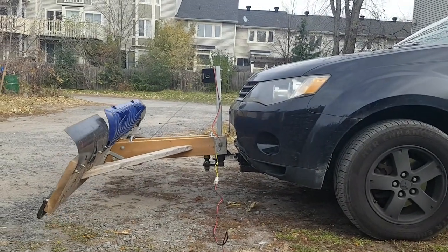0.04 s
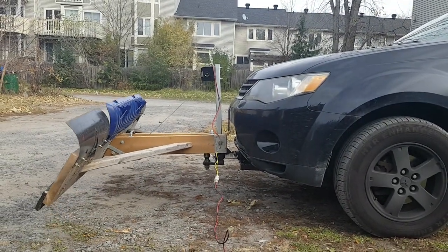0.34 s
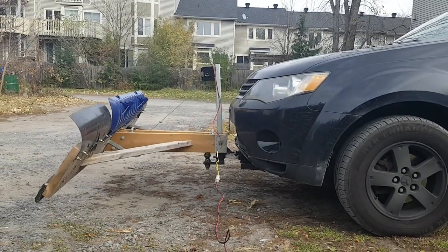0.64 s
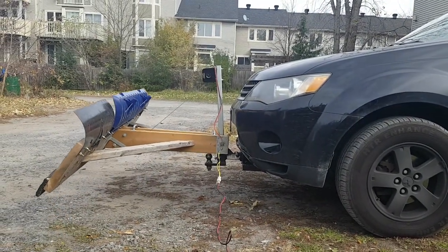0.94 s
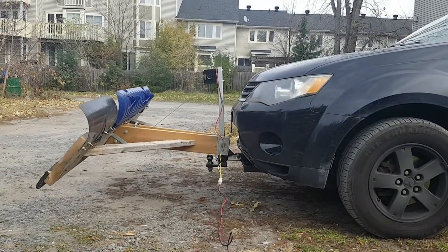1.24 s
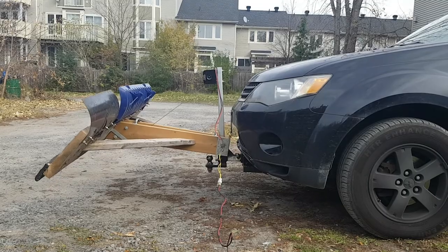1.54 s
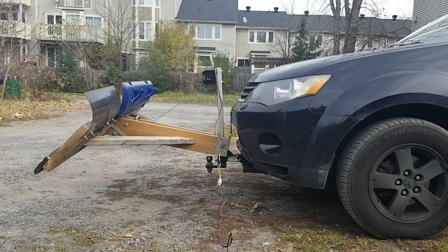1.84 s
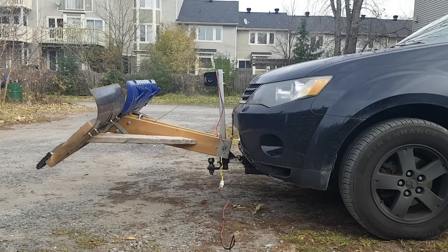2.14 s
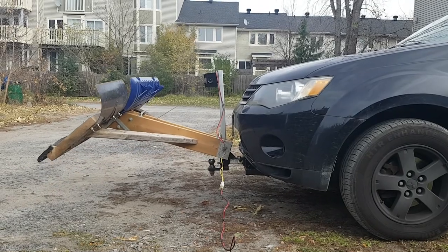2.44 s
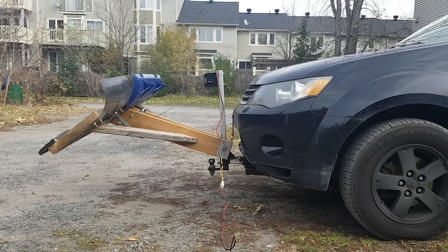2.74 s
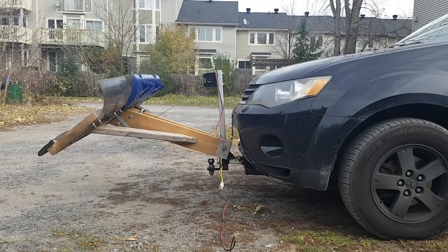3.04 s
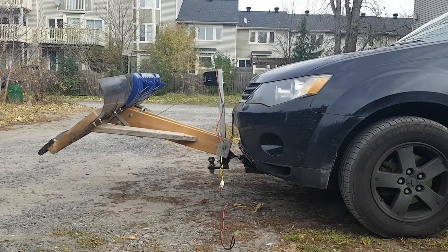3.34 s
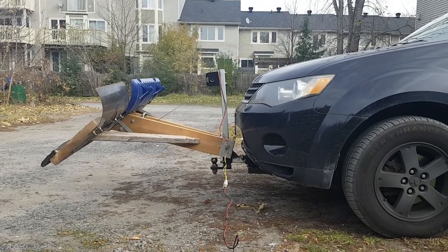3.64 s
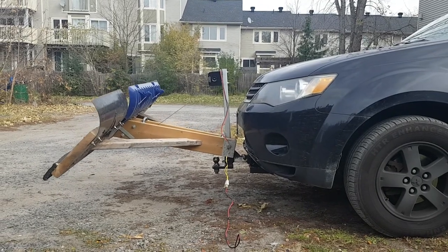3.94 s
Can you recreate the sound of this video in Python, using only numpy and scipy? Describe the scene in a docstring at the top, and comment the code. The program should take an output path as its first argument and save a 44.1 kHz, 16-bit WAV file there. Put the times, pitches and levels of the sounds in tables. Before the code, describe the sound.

An electric winch whines lifting a plow blade outdoors, stops, clicks, then lowers it faster.

```python
"""A small electric winch on a parked car lifts a plow blade, strains to a stop and lets it down again.
Its gears whine at harmonics of the meshing rate, while tooth impacts and friction excite a metal
housing and the motor brushes hiss. Wheels slightly out of true modulate speed and level into a throb.
The rig and the switch click in the pause; around them lies a quiet gravel lot with a faint echo."""
import sys
import numpy as np
from scipy import signal
from scipy.fft import rfft, irfft
from scipy.io import wavfile

SR = 44100
rng = np.random.default_rng(int(sys.argv[2]) if len(sys.argv) > 2 else 0)


def file_out(sig):
    """Save sig as 16-bit WAV at sys.argv[1]."""
    # one column per channel
    cols = np.atleast_2d(sig).T
    # limit, then scale
    lim = np.clip(cols, -1, 1)
    pcm = np.round(lim * 32767).astype(np.int16)
    wavfile.write(sys.argv[1], SR, pcm)


N = 176400
T, HZ = np.arange(N) / SR, np.fft.rfftfreq(N, 1 / SR)


def amp(db):
    """Amplitude ratio of a level in decibels."""
    return 10 ** (np.asarray(db) / 20)


def unit(x):
    """Normalisation to rms 1."""
    return x / np.sqrt(np.mean(x ** 2) + 1e-20)


def curve(points):
    """Linear interpolation over time."""
    return np.interp(T, *np.transpose(points))


def spectrum(points):
    """Interpolation over log frequency."""
    f, value = np.transpose(points)
    return np.interp(np.log(HZ + 1), np.log(f + 1), value)


def colour(x, db):
    """Minimum-phase filter: folding the cepstrum makes the gain curve causal."""
    cepstrum = irfft(np.log(amp(np.maximum(db, -100))), N)
    cepstrum[1:N // 2] *= 2
    cepstrum[N // 2 + 1:] = 0
    response = irfft(np.exp(rfft(cepstrum)), N)[:4096]
    return signal.oaconvolve(x, response)[:N]


def hump(hz, octaves):
    """Resonance curve in dB, 6 dB down at the given half-width."""
    return -20 * np.log10(1 + (np.log2((HZ + 1) / hz) / octaves) ** 2)


def wander(hz):
    """Random modulation: low-passed noise of rms 1."""
    return unit(irfft(rfft(rng.standard_normal(N)) / (1 + (HZ / hz) ** 4), N))


def scatter(x, t60=0.039):
    """All-pass dispersion: the housing smears a sound in time and keeps its colour."""
    t, lead = T[:4096], 256
    tail = rfft(rng.standard_normal(len(t)) * amp(-60 * t / t60))
    allpass = np.roll(irfft(tail / abs(tail)), lead)
    return signal.oaconvolve(x, allpass)[lead:lead + N]


# likeness of left and right: f/Hz, coherence
COHERENCE = [(60, 0.24), (110, 0.37), (200, 1), (380, 0.95), (700, 0.96), (1290, 0.86), (2380, 0.73),
             (4400, 0.19), (8120, 0.14), (15000, 0.29)]
# left minus right: f/Hz, level/dB
BALANCE = [(60, 0), (200, -0.5), (700, 2), (2300, 1.5), (4400, 0.5), (8000, 8), (14000, -1)]

def stereo(common, difference, left_lead_s=.000045, lead_below_hz=2000):
    """Partial coherence: two channels share a mid signal, whose lows reach the left first."""
    same, lean = np.clip(spectrum(COHERENCE), 0, .99), spectrum(BALANCE)
    mid = rfft(common) * np.sqrt((1 + same) / 2)
    side = rfft(difference) * np.sqrt((1 - same) / 2)
    delay = np.exp(-2j * np.pi * HZ * left_lead_s / (1 + (HZ / lead_below_hz) ** 2))
    return irfft(np.array([(mid + side) * amp(lean / 2), (mid - side) * amp(-lean / 2) * delay]), N)


def wheels(cycles, teeth):
    """Periodic modulation: each uneven wheel adds a cosine of the count of teeth passed."""
    return sum(swing * np.cos(2 * np.pi * (teeth - crest) / period) for period, crest, swing in cycles)


# modes of the frame: f/Hz, bandwidth/Hz, level/dB
FRAME_MODES = [(229, 48, -39.5), (403, 72, -37), (551, 148, -35.5), (724, 47, -31), (821.5, 18.5, -33),
               (917, 44, -30.5), (991, 12.6, -34), (1200, 43, -37.5), (1302, 60, -34), (1382, 66, -38.5),
               (1497, 160, -43.5), (1764, 98, -42), (2073, 116, -36), (2540, 77, -40.5), (2787, 100, -43),
               (3036, 94, -41), (3230, 140, -40.5)]
# harmonics 1, 2, 3...: lifting level/dB, lowering level/dB
HARMONICS = [(-4.5, 0), (-5, 0.5), (-2, 0), (-1, -2.5), (0.5, 6.5), (-1.5, 4), (-1.5, -1), (1, 5.5),
             (-0.5, 6.5), (-0.5, -1), (-1, 9), (-3.5, 5), (-2.5, -2)]
# their swell while lifting: once-a-turn swing/dB, its crest/teeth, twice-a-turn swing/dB
HARMONIC_SWELLS = [(5, 19, 0), (1.3, 41, 0), (0, 0, 3), (2.2, 44, 0), (1.3, 40, 3.9), (2.2, 11, 2.4),
                   (4, 17, 1), (2.4, 43, 1.4), (2.6, 3, 1), (1.8, 3, 1), (2.8, 1, 0), (3.4, 7, 0),
                   (2, 3, 0)]
# gain of the whine as the teeth bear harder: t/s, level/dB
TOOTH_LOAD = [(0, -.5), (.6, 0), (.9, -1), (2.52, -1), (2.62, 1), (2.82, 1.5), (3.5, -12), (3.555, 0),
              (4, 0)]

def whine(teeth, turned, lowering, throb_db, roughness=.36, flutter_hz=32):
    """Forced vibration: harmonics of the meshing rate flare as they cross the frame's resonances."""
    wheel_teeth, tight_tooth = 47.3, 20
    out, mesh_hz = np.zeros(N), np.gradient(teeth) * SR
    frame = np.sqrt(sum(amp(db) ** 2 / (1 + (2 * (HZ - hz) / width) ** 2)
                        for hz, width, db in FRAME_MODES))
    for k, (lift_db, lower_db) in enumerate(HARMONICS, 1):
        once_db, crest, twice_db = HARMONIC_SWELLS[k - 1]
        swell = wheels([(wheel_teeth, crest, once_db), (wheel_teeth / 2, tight_tooth, twice_db)], turned)
        db = np.where(lowering, lower_db, lift_db + swell) + throb_db
        flutter = 1 + roughness * (wander(flutter_hz) + 1j * wander(flutter_hz))
        carrier = np.exp(2j * np.pi * (k * teeth + rng.random()))
        out += amp(db) * np.interp(k * mesh_hz, HZ, frame) * unit((flutter * carrier).real)
    return out * amp(curve(TOOTH_LOAD))


# response of the housing, lifting and lowering: f/Hz, relative level/dB
HOUSING_LIFT = [(100, -25.5), (200, -17.5), (330, -12.5), (430, -9.5), (540, -7.5), (640, -4), (820, -0.5),
                (950, -4), (1170, -6), (1370, -10.5), (1700, -8), (2080, -0.5), (2350, -12), (2600, -8),
                (3050, -6), (3450, -9.5), (3900, -15.5), (4900, -20.5), (7000, -24.5), (8300, -24),
                (8900, -32.5), (11300, -37), (13500, -28.5), (15600, -65)]
HOUSING_LOWER = [(59, -60), (100, -16), (173, -20.5), (293, -13.5), (394, -4), (497, -17.5), (640, -3),
                 (758, 2), (1060, -8.5), (1180, -34), (1460, -3), (1960, -4.5), (2470, -8), (3050, -4),
                 (4860, -21), (8060, -22), (8950, -28), (11100, -25.5), (15500, -37)]
# modes of the housing: f/Hz, bandwidth/Hz, level/dB
HOUSING_MODES = [(575.6, 77, -47), (1334, 160, -39.5), (2035, 56, -47), (2390, 41, -53), (2993, 30, -46)]

def rattle(teeth, lowering, lift_db=-32, lower_db=-28.7, spread_db=7.5, jitter_s=.00012):
    """Impact and friction: each tooth knocks and scrapes, exciting the housing and its modes."""
    contacts = np.flatnonzero(np.diff(np.floor(teeth)) > 0)
    size, late = rng.standard_normal((N // 20, 2))[:len(contacts)].T
    onsets = np.clip(contacts + (late * jitter_s * SR).astype(int), 0, N - 1)
    knocks, paths = np.zeros(N), []
    knocks[onsets] = amp(spread_db * np.clip(size, -2, 2))
    scrape_share = 0.74  # of the driving power
    for _ in range(2):
        scrape = unit(rng.standard_normal(N) * np.exp(-(teeth % 1)))
        impacts = unit(scatter(knocks - knocks.mean()))
        drive = np.sqrt(1 - scrape_share) * impacts + np.sqrt(scrape_share) * scrape
        lift = amp(lift_db) * unit(colour(drive, spectrum(HOUSING_LIFT)))
        lower = amp(lower_db) * unit(colour(drive, spectrum(HOUSING_LOWER)))
        body = np.where(lowering, lower, lift)
        for hz, width, db in HOUSING_MODES:
            peak = signal.iirpeak(hz, hz / width / 2, SR)
            body += amp(db) * unit(signal.lfilter(*peak, signal.lfilter(*peak, drive)))
        paths.append(body)
    return np.array(paths)


# modes of small, dry steel parts: f/Hz, level/dB, T60/s
STEEL_MODES = [(4327, -55, 0.094), (5310, -62, 0.057), (6100, -59.5, 0.078), (6620, -65, 0.28),
               (8020, -58, 0.046), (8330, -64.5, 0.032), (10570, -65.5, 0.018), (13500, -69, .008)]

def chirps(lowering, hits_per_s=55, spread_db=5, lowering_boost_db=5):
    """Damped free vibration: chance contacts set small steel parts ringing."""
    out, t = np.zeros((2, N)), T[:SR // 8]
    for hz, db, t60 in STEEL_MODES:
        struck = rng.random(N) < hits_per_s / SR
        hits = struck * amp(spread_db * np.clip(rng.standard_normal(N), -2, 2))
        tone = np.sin(2 * np.pi * hz * t) * t * amp(-60 * t / t60)
        for path in out:
            path += amp(db) * unit(signal.oaconvolve(hits * rng.choice([-1, 1], N), tone)[:N])
    return out * amp(lowering_boost_db * lowering)


# hiss of the motor brushes: f/Hz, relative level/dB
BRUSH_SPECTRUM = [(1500, -5), (3300, 4), (4800, -11), (7800, 1), (8400, -2), (9000, -9), (11000, 0),
                  (13400, -9), (15600, -10.5)]

def brushes(lowering, db=-47, lowering_boost_db=4.5, waver_db=2, waver_hz=37):
    """Sliding-contact noise: a wavering hiss, louder as the motor runs free to lower the blade."""
    hiss = np.array([unit(colour(rng.standard_normal(N), spectrum(BRUSH_SPECTRUM))) for _ in range(2)])
    return hiss * amp(db + lowering_boost_db * lowering + waver_db * wander(waver_hz))


# teeth meshing per second under load: t/s, f/Hz
MESH_RATE = [(0, 251), (.55, 253), (.9, 259), (1.35, 266), (1.8, 272), (2.15, 275), (2.5, 267), (2.65, 250),
             (2.73, 234), (2.84, 225), (3.48, 150), (3.52, 230), (3.55, 284), (3.58, 327), (3.61, 353),
             (3.65, 373), (3.72, 384), (3.82, 389), (3.9, 397), (4, 399)]
# speed sway from uneven wheels: period/teeth, crest/teeth, swing/Hz
SPEED_SWAY = [(47.65, 35.8, 4.7), (21.75, 20.1, 1.9), (43.5, 24.2, 1.6), (51.4, 29.9, 1.1), (40.5, 29.3, 1)]
# level swell from tight spots: period/teeth, crest/teeth, relative swing
TIGHT_SPOTS = [(23.7, 19.8, 1.6), (16.4, 14.5, 1.3), (25.05, 15.3, .6), (47.65, 45.3, .5), (15.5, 11.4, .5)]
# depth of that swell: t/s, factor
THROB_DEPTH = [(.05, .6), (.25, 1.05), (.5, 1.05), (1, .72), (2.3, .72), (2.7, .4), (4, .4)]
# how hard the gears are driven: t/s, level/dB
EFFORT = [(0, 0), (.6, 0.5), (1.1, 0.5), (2.2, 1.2), (2.55, 0.5), (2.6, 0), (2.67, -0.5), (2.816, -1.5),
          (2.847, -18.5), (2.93, -48), (3.05, -48), (3.46, -50), (3.482, -21), (3.505, -3.5), (3.57, -1.5),
          (3.75, 1.5), (4, 1.5)]

def winch(reverse_s=3.2, slip_teeth=.01, slip_hz=35):
    """Frequency and amplitude modulation: one rotation sways the pitch and makes the gear train throb."""
    speed = curve(MESH_RATE)
    turned = np.cumsum(speed) / SR  # teeth passed, without sway or slip
    teeth = np.cumsum(speed + wheels(SPEED_SWAY, turned)) / SR + slip_teeth * wander(slip_hz)
    lowering = T > reverse_s
    throb = wheels(TIGHT_SPOTS, turned) * curve(THROB_DEPTH)
    tone = whine(teeth, turned, lowering, throb_db=.6 * throb)
    noise = (rattle(teeth, lowering) + chirps(lowering) + brushes(lowering)) * amp(.85 * throb)
    paths = np.array([tone, scatter(tone)]) + noise + flares()
    return stereo(*(paths * amp(curve(EFFORT))))


def echo(x, t60=0.67):
    """Reverberation: dense reflections from the houses decay exponentially."""
    t = T[:SR // 2]
    tail = rng.standard_normal(len(t)) * amp(-60 * t / t60)
    reflections = signal.oaconvolve(x, tail / np.linalg.norm(tail))[:N]
    return colour(reflections, hump(hz=700, octaves=3.5))


# distant outdoor wash: f/Hz, relative level/dB
AIR_SPECTRUM = [(15, -74), (25, -31), (37, -19), (64, -9), (281, -11), (399, -9), (445, -7), (684, -9.5),
                (741, -3), (1110, -11), (2010, -21), (8810, -43.5), (15500, -41)]
# low rumble: t/s, level/dB
RUMBLE_LEVEL = [(0, -79), (1.1, -62), (1.7, -56), (2.2, -59), (2.9, -94), (3.6, -69), (3.85, -48.5),
                (4, -60)]

def outdoors(air_db=-47, air_side=0.63, rumble_side=0.76, rumble_left_db=8.0):
    """Ambient noise, partly coherent between the ears: a steady wash and a lumpy rumble to the left."""
    air = [unit(colour(rng.standard_normal(N), spectrum(AIR_SPECTRUM))) for _ in range(2)]
    low = [unit(colour(rng.standard_normal(N), hump(hz=85, octaves=1))) for _ in range(2)]
    sides = np.array([[1], [-1]])
    wash = (air[0] + air_side * sides * air[1]) * amp(air_db + .5 * wander(hz=7.1))
    rumble_db = curve(RUMBLE_LEVEL) + rumble_left_db * sides + 2 * wander(hz=13)
    return wash + (low[0] + rumble_side * sides * low[1]) * amp(rumble_db)


# flares and squeaks: centre t/s, half-length/s, f/Hz, half-width/octaves, level/dB
FLARES = [(2.378, .005, 12800, .04, -40), (2.619, 0.02, 785, 0.037, -23), (3.562, 0.017, 889, 0.015, -23.5),
          (3.68, .025, 3310, .04, -28.5), (3.697, 0.011, 3025, 0.018, -27),
          (3.712, 0.0073, 8110, 0.027, -37), (3.87, 0.021, 420, 0.088, -28)]

def flares():
    """Brief narrow-band bursts: the whine flares on the casing's resonances, with a few high squeaks."""
    out = np.zeros((2, N))
    for s, length, hz, octaves, db in FLARES:
        band = irfft(rfft(rng.standard_normal((2, N))) * amp(hump(hz, octaves)), N)
        out += unit(band) * amp(db) * np.exp(-((T - s) / length) ** 2)
    return out


# snaps of the rig and switch: t/s, level/dB, f/Hz, half-width/octaves, T60/s
RIG_CLICKS = [(2.868, -33.5, 2420, 0.49, 0.026), (3.058, -46, 2380, 0.35, 0.046),
              (3.102, -42, 1100, 0.55, 0.017), (3.382, -32.5, 1670, 0.26, 0.024),
              (3.42, -36, 5940, 5, 0.033), (3.431, -38, 8000, 6.6, 0.013), (3.463, -55, 7000, 1.5, .02)]

def clicks():
    """Heavily damped transients: each snap is decaying noise through one broad resonance."""
    out = np.zeros((2, N))
    for s, db, hz, octaves, t60 in RIG_CLICKS:
        resonance = hump(hz, octaves)
        rms_gain = np.sqrt(np.mean(amp(resonance) ** 2))
        decay = (T >= s) * amp(db - 60 * np.maximum(T - s, 0) / t60)
        for path in out:
            path += colour(rng.standard_normal(N) * decay, resonance) / rms_gain
    return stereo(*out)


def scene(echo_db=-13):
    """Superposition of the direct sound, its faint echo and the outdoor background."""
    direct = winch() + clicks()
    reflected = np.array([echo(side) for side in direct])
    return direct + amp(echo_db) * reflected + outdoors()


def record(dry, cutoff_hz=15800):
    """Band limiting by a steep linear-phase low-pass filter."""
    lowpass = signal.firwin(801, cutoff_hz, window=("kaiser", 9), fs=SR)
    return signal.oaconvolve(dry, lowpass[None], "same")


dry = scene()
out = record(dry)
file_out(out)
```